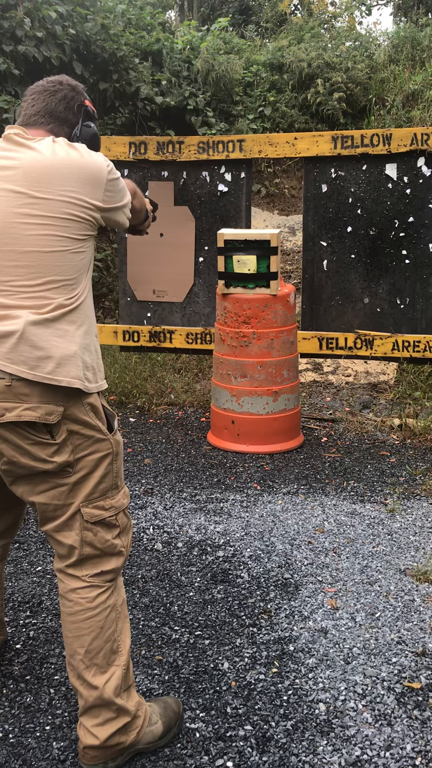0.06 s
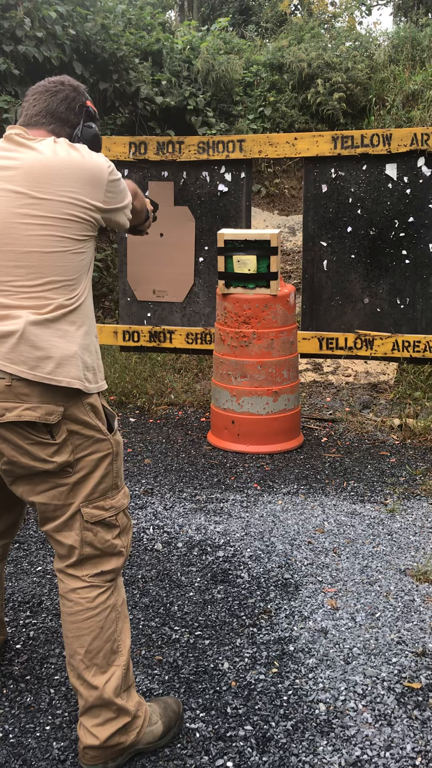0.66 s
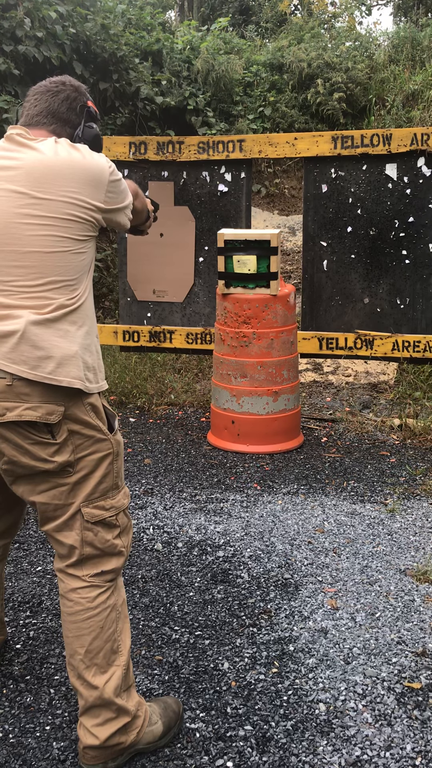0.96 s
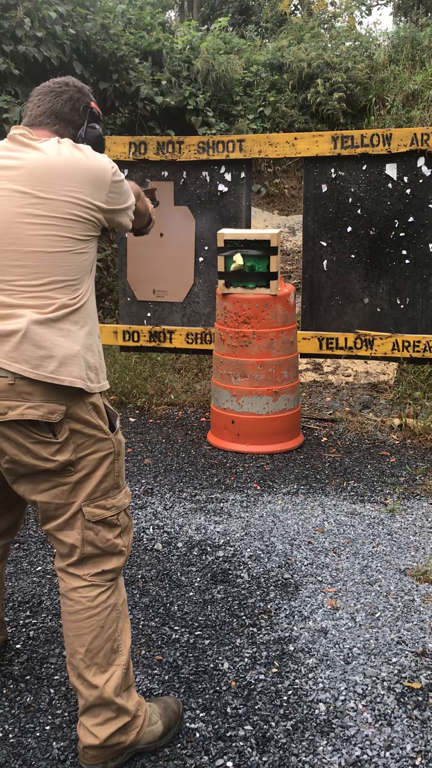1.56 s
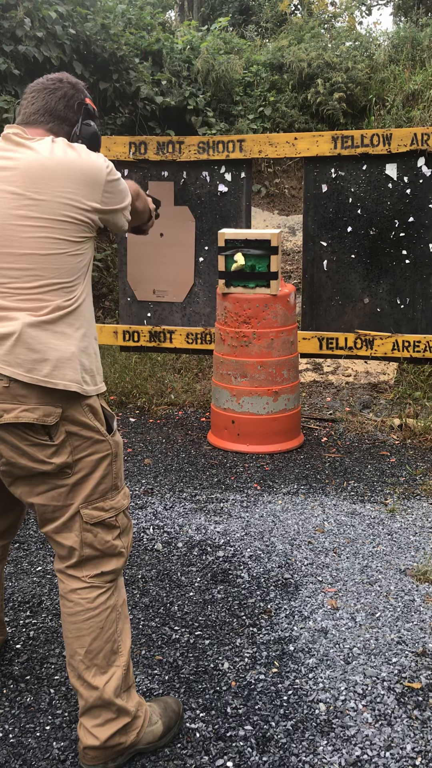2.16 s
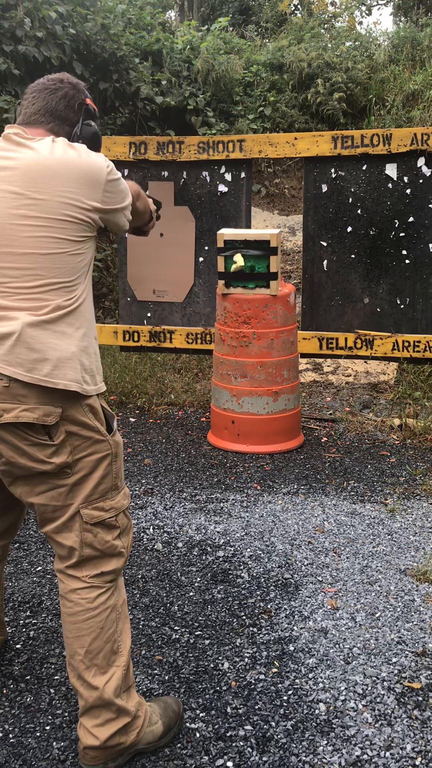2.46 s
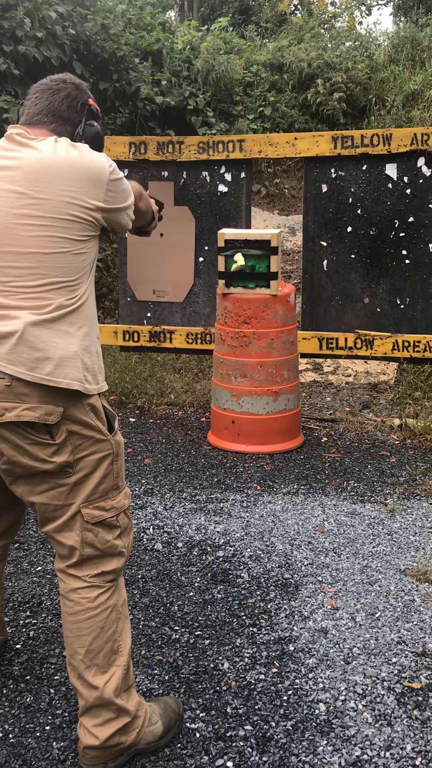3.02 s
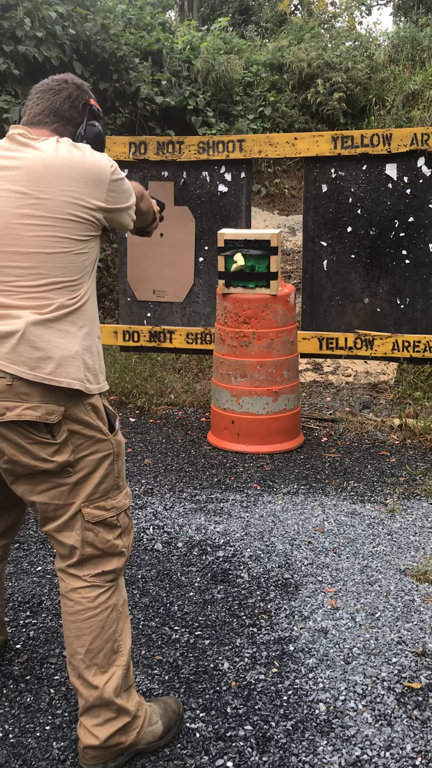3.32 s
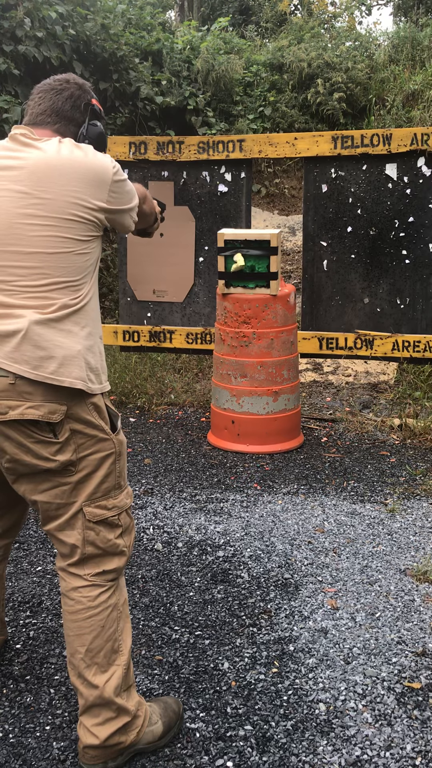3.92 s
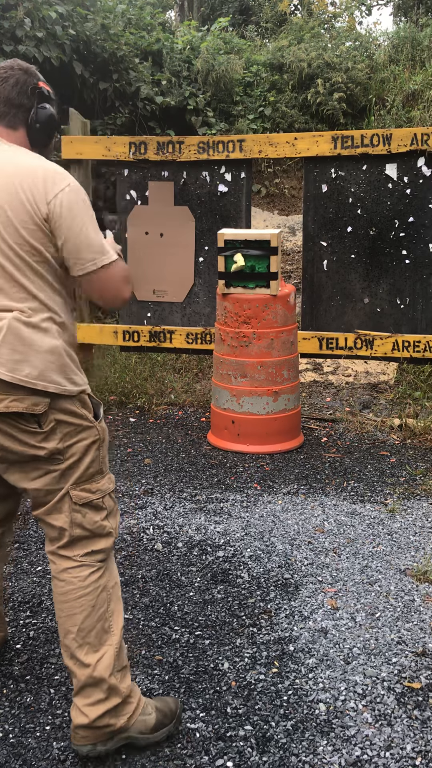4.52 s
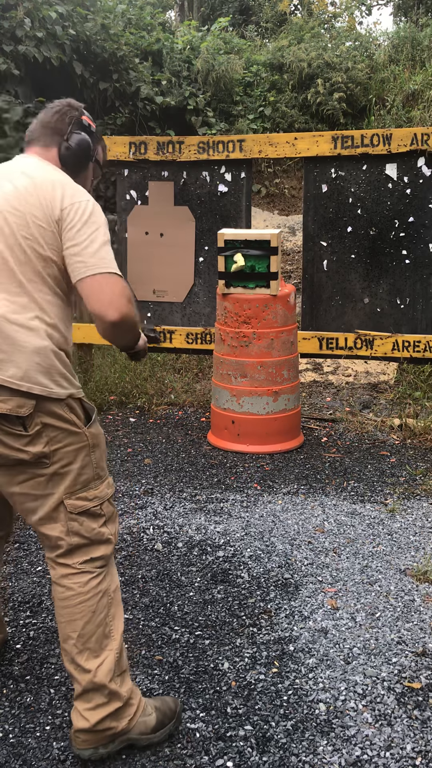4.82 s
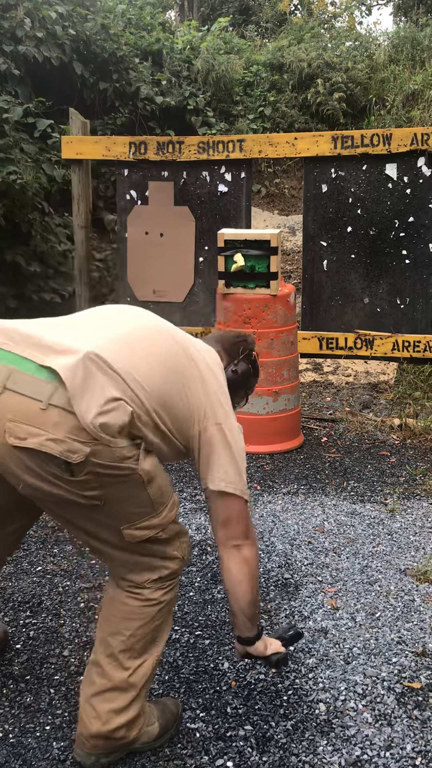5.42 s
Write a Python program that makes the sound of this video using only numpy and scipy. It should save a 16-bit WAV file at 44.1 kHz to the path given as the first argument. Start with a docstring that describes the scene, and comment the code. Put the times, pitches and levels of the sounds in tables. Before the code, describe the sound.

A single close pistol shot echoes outdoors over steady crickets, followed by a casing clink, a metal click and boots on gravel.

```python
"""An outdoor gravel range: one pistol shot, close to a phone whose gain ducks and slowly recovers.
The blast returns from ground, barrier and bank, then as low, hollow reflections; the tree line echoes
and the woods ring on. The brass case lands and bounces, steel parts click in the pistol, and the
shooter's boots grind and snap the gravel. Crickets chirr throughout over a low rumble."""
import sys
import numpy as np
from scipy import signal
from scipy.fft import rfft, irfft, next_fast_len
from scipy.io import wavfile
from scipy.ndimage import uniform_filter1d, minimum_filter1d, map_coordinates

SR = 44100
rng = np.random.default_rng(int(sys.argv[2]) if len(sys.argv) > 2 else 0)


def wav_out(sig):
    """Save sig, one row per channel (or a flat mono array), as 16-bit PCM at SR to the path in sys.argv[1]."""
    wavfile.write(sys.argv[1], SR, np.round(np.clip(np.atleast_2d(sig).T, -1, 1) * 32767).astype(np.int16))


N = 250488
T = np.arange(N) / SR
STONE_HZ = 1500  # typical stone

# Background spectra. Each row: frequency in Hz, level in dB.
RUMBLE_SPECTRUM = [(12, -44.5), (22, -19), (42, -2.5), (60, -1.5), (85, -1), (108, -4), (134, -13.5),
                   (247, -23), (280, -26), (300, -24), (390, -59), (660, -120)]
AIR_SPECTRUM = [(100, -10.5), (250, 7), (500, -0.5), (1100, -2), (2000, -6), (2800, -8.5), (3900, -8),
                (7500, -10.5), (10300, -17), (12500, -12.5), (16000, -16)]
FAR_CRICKET_SPECTRUM = [(4000, -32), (4800, -13.5), (5400, -5.5), (6100, -1), (6500, 5), (6900, -4.5),
                        (7400, -13), (8500, -34.5)]
# Gravel and cloth spectra. Each row: frequency in Hz, level in dB.
GRIT_SPECTRUM = [(100, -11), (300, 2), (700, -5), (1300, 1.5), (2000, -6.5), (3500, -8), (6000, -21.5),
                 (12000, -35)]
SNAP_SPECTRUM = [(900, -18), (2000, -6.5), (2800, -12), (4300, -8.5), (6000, -28), (9000, -33)]
CHIP_SPECTRUM = [(3000, -16), (6000, -9.5), (9000, 3), (10500, -8), (12000, 1), (16000, -13)]
CLOTH_SPECTRUM = [(1000, -38.5), (3000, -3.5), (5000, -1), (8000, 0), (10500, -6), (13000, -5),
                  (16000, -15.5)]
# How hard the shooter moves. Each row: time in seconds, effort in dB.
EFFORT_CURVE = [(3.95, -29.5), (4.1, -14), (4.3, -7), (4.55, 0), (4.78, -15), (5.05, -1.5), (5.4, 3),
                (5.68, 1.5)]
# Sole scuffs. Each row: peak time, swell and fade in seconds, grit and cloth levels in dB.
SOLE_SCUFFS = [(4.614, 0.032, 0.049, -56, -55.5), (4.945, 0.024, 0.018, -55, -60.5),
               (5.102, 0.0393, .015, -60.5, -55), (5.275, .003, 0.031, -62.5, -51),
               (5.355, 0.0186, 0.0175, -71, -56), (5.499, 0.0268, 0.0544, -54.5, -49.5)]
# Stones underfoot. Each row: start in seconds, level in dB, pitch in Hz, relative chip level in dB.
STONE_SNAPS = [(0.284, -50, 1450, -20), (0.433, -52.5, 1490, -12), (4.1142, -52, 1800, -20),
               (4.2068, -44.5, 1630, -22), (4.3128, -26, 1399, -11), (4.362, -44.5, 1752, -24),
               (4.3815, -44, 1690, -18), (4.4523, -29, 1580, -17), (4.5148, -35, 1810, -14),
               (4.6113, -28, 1560, -12), (4.6438, -32, 1650, -26), (4.659, -36.5, 1474, -20),
               (4.733, -43, 1770, -13), (4.9075, -32, 1398, -21), (4.941, -27, 1470, -15.5),
               (5.0763, -34.5, 1540, -16), (5.2743, -42.5, 1400, -2.5), (5.4137, -34, 1330, -18),
               (5.4774, -24, 1210, -13.5), (5.53, -38, 954, -13), (5.5834, -34, 1400, -20),
               (5.5965, -28, 1480, -24), (5.6183, -41, 1400, -17), (5.6512, -34.5, 1350, -25)]
# Steel contacts in the pistol. Each row: start in seconds, level in dB.
STEEL_HITS = [(3.704, -13), (3.7077, -24), (3.7194, -25.5)]
# Spectra of steel on steel and brass on stone. Each row: frequency in Hz, level in dB.
STEEL_SPECTRUM = [(200, -42.5), (700, -42.5), (1300, -10.5), (2000, -21), (2600, -1.5), (3400, 1),
                  (4500, -2), (6000, 4), (8500, -3.5), (10500, -1.5), (12500, -11.5), (16000, -12.5)]
CLINK_SPECTRUM = [(300, -23.5), (1000, -6.5), (2300, -2), (3300, 0), (4700, 3), (7000, -2), (9500, -11),
                  (11500, 4), (13500, -11), (16000, 0)]
# Case landings. Each row: start in seconds, clink, low ring and high ring levels in dB.
CASE_HITS = [(2.5497, -8.5, -40, -28), (2.762, -22, -50, -60)]
# Case modes. Each row: frequency in Hz, relative level in dB, T60 in seconds.
CASE_MODES = [(4190, 13, 0.0132), (4510, -5, 0.093), (4450, 10, 0.016), (5943, 5, 0.0245),
              (11230, -7, 0.219), (11500, 3, 0.075), (13020, -5, .07)]
# Tree line and woods spectra. Each row: frequency in Hz, level in dB.
TREE_LINE_SPECTRUM = [(50, -34), (140, -7), (330, -3.5), (480, -5), (620, 4.5), (950, 1), (1400, -2),
                      (3000, -6), (6500, -11), (10000, -24.5), (15500, -36)]
WOODS_SPECTRUM = [(60, -21), (150, -4), (220, -9.5), (330, 0), (500, -6.5), (900, -2.5), (1500, -7.5),
                  (2500, -6), (5000, -12), (9000, -21), (15000, -59)]
# Decay in the woods. Each row: frequency in Hz, T60 in seconds.
WOODS_DECAY = [(150, 1.67), (400, 2.32), (1000, 2.117), (2500, 1.555), (5000, 1.243), (12000, 0.78)]
# Slaps off far trunks and banks. Each row: start in seconds, level in dB, pitch in Hz.
FAR_SLAPS = [(1.87, -14, 242.5), (1.925, -23, 236), (1.966, -10, 258), (2.01, -29, 170),
             (2.064, -12.5, 355.7), (2.09, -22, 160)]
# Hollow reflections. Each row: start in seconds, level in dB, pitch in Hz, T60 in seconds.
LOW_REFLECTIONS = [(1.728, -7, 305.8, 0.21), (1.742, -3.5, 264, .07), (1.763, -8.5, 540, 0.062),
                   (1.7918, 6, 278.3, 0.023), (1.804, -14.5, 348, 0.079), (1.818, -13, 406, 0.037)]
# The blast and its returns from ground, barrier and bank.
# Each row: start in seconds, boom and crack levels in dB, rise and T60 in seconds.
BLAST_WAVES = [(1.638, -3.5, -1.5, 0.0011, 0.15), (1.6503, 12, -27.5, 0.0018, .13),
               (1.661, 12.5, 12.5, 0.00026, 0.1364), (1.683, -6, 12.5, 0.0022, 0.16),
               (1.692, -7.5, 5, 0.0013, 0.25)]
# Blast spectra. Each row: frequency in Hz, level in dB.
BOOM_SPECTRUM = [(20, -19.5), (45, -4), (80, -3), (120, -6.5), (160, -8.5), (230, -1), (400, 0), (480, -4),
                 (680, -1.5), (820, -12), (970, -0.5), (1400, -15), (3000, -31.5), (8000, -73)]
CRACK_SPECTRUM = [(30, -18.5), (150, -12), (300, -1.5), (480, -1), (1000, 1), (1700, -2), (2400, 1),
                  (3800, -1), (6500, -0.5), (9500, -4), (11000, -7), (15500, -9)]


def amp(db):
    """Decibels to gain."""
    return 10 ** (np.asarray(db) / 20)


def along(points, hz):
    """(Hz, value) points read on a log axis."""
    knots_hz, values = np.transpose(points)
    return np.interp(np.log(hz + 1), np.log(knots_hz), values)


def filtered(x, response):
    """Zero-phase filter with gain response(hz)."""
    size = next_fast_len(N + 8192)
    return irfft(rfft(x, size) * response(np.fft.rfftfreq(size, 1 / SR)), size)[:N]


def noise(spectrum, grain=1):
    """Coloured noise of rms 1; grain gates it before the colouring."""
    x = filtered(grain * rng.standard_normal(N), lambda hz: amp(along(spectrum, hz)))
    return x / np.sqrt(np.mean(x ** 2) + 1e-20)


def wobble(rate_hz):
    """Smooth random curve with knots at rate_hz."""
    return map_coordinates(rng.standard_normal(int(N * rate_hz / SR) + 4), [T * rate_hz])


def burst(start_s, rise_s, t60_s):
    """Envelope with exponential rise and decay."""
    out = np.zeros(N)
    alive = slice(int(start_s * SR) + 1, int((start_s + 2 * t60_s) * SR))
    age_s = T[alive] - start_s
    out[alive] = (1 - np.exp(-age_s / rise_s)) * np.exp(-np.log(1000) * age_s / t60_s)
    return out


def ring(start_s, hz, t60_s, rise_s):
    """One struck, damped mode."""
    out = burst(start_s, rise_s, t60_s)
    alive = out > 0
    out[alive] *= np.sin(2 * np.pi * hz * (T[alive] - start_s))
    return out


def impacts(hits, spectrum, size=1024):
    """Hard contacts (start in seconds, peak in dB), each one minimum-phase pulse."""
    cepstrum = irfft(np.log(amp(along(spectrum, np.fft.rfftfreq(size, 1 / SR)))))
    cepstrum[1:size // 2] *= 2
    cepstrum[size // 2 + 1:] = 0
    pulse = irfft(np.exp(rfft(cepstrum)))
    start_s, peak_db = np.transpose(hits)
    train = np.bincount(np.round(start_s * SR).astype(int), amp(peak_db), N)[:N]
    return signal.fftconvolve(train, pulse / np.abs(pulse).max())[:N]


def outdoors():
    """Lumpy low rumble, soft air and a blur of far crickets."""
    rumble = amp(-53.5 + 1.8 * wobble(10)) * noise(RUMBLE_SPECTRUM)
    air = amp(-65.5 + 0.37 * wobble(2.3)) * noise(AIR_SPECTRUM)
    chorus = amp(-62 + 1.2 * wobble(150)) * noise(FAR_CRICKET_SPECTRUM)
    return rumble + air + chorus


def tree_crickets():
    """Far trills blur into one thin, uneven band."""
    level_db = -81 + 2 * wobble(4.2) + 1.5 * wobble(60)
    return amp(level_db) * noise([(2900, -30.5), (3250, 1), (3450, -0.5), (3800, -31), (5000, -69)])


def peep(peak_s=1.29, pitch_hz=3700, glide_hz=150, width_s=0.014):
    """One faint falling peep from the bushes."""
    position = (T - peak_s) / width_s
    hz = pitch_hz - glide_hz * np.tanh(position) + 60 * wobble(400)
    return amp(-64) * np.exp(-position ** 2) * np.sin(2 * np.pi * np.cumsum(hz) / SR)


def ticking_cricket(period_s=0.0585, gap_s=0.015, pitch_hz=6750, glide_hz=500, width_s=0.002):
    """Paired wing strokes, each a quick downward glide."""
    clock_s = T + 0.002 * wobble(11)
    out = np.zeros(N)
    for offset_s in (0, gap_s):
        position = ((clock_s - offset_s) % period_s - period_s / 2) / width_s
        phase = 2 * np.pi * np.cumsum(pitch_hz - glide_hz * np.tanh(position / 2)) / SR
        out += np.exp(-position ** 2) * np.sin(phase)
    return amp(-53 + 1.7 * wobble(20)) * out


def chirping_cricket(first_s=0.03, period_s=0.2652, stroke_s=0.013, pitch_hz=5615, sag=0.036, rasp=0.0077):
    """Raspy chirps of four wing strokes that sag in pitch; the bushes trail each one."""
    age_s = (T - first_s) % period_s
    strokes = np.abs(np.sin(np.pi * age_s / stroke_s))
    progress = np.minimum(age_s / (4 * stroke_s), 1)
    hz = pitch_hz * (1 - sag * progress ** 3 + rasp * wobble(900))
    phase = 2 * np.pi * np.cumsum(hz) / SR
    swell = strokes * np.abs(np.sin(np.pi * progress)) ** 0.5
    band = noise([(5000, -40.5), (5350, -0.5), (5600, 0.5), (5950, -39.5)])
    trail = np.exp(-((age_s - 0.045) / 0.03) ** 2) * band
    return swell * (amp(-58) * np.sin(phase) + amp(-67) * np.sin(2 * phase)) + amp(-66) * trail


def effort_db():
    """The shooter's effort, per sample."""
    return np.interp(T, *np.transpose(EFFORT_CURVE))


def creaks(count=44, scatter_db=3, pitch_spread=0.2):
    """Stones creak faintly under the shooter's stance, louder as he moves."""
    starts_s = (np.arange(count) + rng.random(count)) * T[-1] / count
    ticks = np.zeros(N)
    for start_s, (size, pitch) in zip(starts_s, rng.standard_normal((count, 2))):
        hz = STONE_HZ * np.exp(pitch_spread * pitch)
        ticks += amp(scatter_db * min(size, 1)) * ring(start_s, hz, t60_s=0.0065, rise_s=0.0004)
    return amp(-47 + 0.34 * effort_db()) * ticks


def crunch(count=260):
    """Small stones click at their own pitches and sizes; rms 1 while the boots move."""
    when, pitch = rng.random((count, 2)).T
    size_db = 4 * np.minimum(rng.exponential(size=count), 3)
    hz = 900 * 4.5 ** (pitch[:, None] ** 1.5)
    age_s = np.arange(SR // 100) / SR
    grains = amp(size_db)[:, None] * np.sin(2 * np.pi * hz * age_s) * np.exp(-0.8 * hz * age_s)
    first = int(EFFORT_CURVE[0][0] * SR)
    index = (first + when[:, None] * (N - first)).astype(int) + np.arange(len(age_s))
    out = np.bincount(index.ravel(), grains.ravel(), N)[:N]
    return out / np.std(out[first:])


def boots():
    """Grit grinds and cloth rustles with the effort; each scuff swells and fades on top."""
    grit_gain, cloth_gain = amp(effort_db() - 63), amp(effort_db() - 65)
    for peak_s, swell_s, fade_s, grit_db, cloth_db in SOLE_SCUFFS:
        stroke = np.exp(-np.maximum((peak_s - T) / swell_s, (T - peak_s) / fade_s))
        grit_gain = np.hypot(grit_gain, amp(grit_db) * stroke)
        cloth_gain = np.hypot(cloth_gain, amp(cloth_db) * stroke)
    grit = noise(GRIT_SPECTRUM, grain=amp(3.2 * wobble(400))) + crunch()
    cloth = noise(CLOTH_SPECTRUM, grain=amp(3.5 * wobble(300)))
    return grit_gain * grit + cloth_gain * cloth


def stones(snap_db_per_octave=28.5):
    """Stones snap with a dull tick and a bright chip; smaller, higher ones snap harder."""
    ticks, snaps, chips = np.zeros((3, N))
    for start_s, db, hz, chip_db in STONE_SNAPS:
        snap_db = -12.5 + snap_db_per_octave * np.log2(hz / STONE_HZ)
        ticks += amp(db + 5.5) * ring(start_s + 0.00067, hz, t60_s=0.0058, rise_s=0.00075)
        snaps += amp(db + snap_db) * burst(start_s + 0.00092, rise_s=0.00008, t60_s=0.014)
        chips += amp(db + chip_db) * burst(start_s + 0.00063, rise_s=0.00018, t60_s=0.0088)
    contacts = impacts([(s + 0.00081, db - 5.5) for s, db, *_ in STONE_SNAPS], GRIT_SPECTRUM)
    return contacts + ticks + snaps * noise(SNAP_SPECTRUM) + chips * noise(CHIP_SPECTRUM)


def pistol_click():
    """Steel parts snap home with a brief rattle; the barrier scatters the click back."""
    rattle = sum(amp(db - 8) * burst(s, rise_s=0.00012, t60_s=0.0068) for s, db in STEEL_HITS)
    scatter = amp(-39.5) * burst(STEEL_HITS[0][0], rise_s=0.0026, t60_s=0.197)
    return impacts(STEEL_HITS, STEEL_SPECTRUM) + (rattle + scatter) * noise(STEEL_SPECTRUM)


def spent_case():
    """The case clinks on a stone and bounces once; its thin ring flutters as it spins."""
    out = impacts([(s, db) for s, db, *_ in CASE_HITS], CLINK_SPECTRUM)
    clink = noise(CLINK_SPECTRUM)
    for start_s, clink_db, low_db, high_db in CASE_HITS:
        strike = burst(start_s, rise_s=0.0001, t60_s=0.0071)
        tail = amp(-22) * burst(start_s, rise_s=0.0028, t60_s=0.18)
        out += amp(clink_db - 9.5) * clink * (strike + tail)
        for hz, mode_db, t60_s in CASE_MODES:
            ring_db = mode_db + (low_db if hz < 8000 else high_db)
            flutter = amp(2.2 * wobble(220))
            out += amp(ring_db) * flutter * ring(start_s, hz, t60_s, rise_s=0.00053)
    return out


def echoes(start_s=1.88):
    """The tree line answers a quarter second after the shot; the woods ring on, treble dying first."""
    slaps = sum(amp(db) * ring(s, hz, t60_s=0.031, rise_s=0.00327) for s, db, hz in FAR_SLAPS)
    hz, frame_s, bins = signal.stft(noise(WOODS_SPECTRUM), SR, nperseg=512)
    fade = np.exp(-np.log(1000) * np.maximum(frame_s - start_s, 0) / along(WOODS_DECAY, hz)[:, None])
    woods = signal.istft(bins * fade, SR, nperseg=512)[1][:N]
    swell = np.clip((T - start_s + 0.0404) / 0.097, 0, 1)
    tree_line = noise(TREE_LINE_SPECTRUM, grain=amp(0.93 * wobble(150)))
    tree_line *= burst(start_s, rise_s=0.086, t60_s=0.53)
    return amp(-8) * tree_line + slaps + amp(-22) * swell * woods


def low_reflections(highpass_hz=160):
    """Short, low, hollow reflections follow the blast."""
    returns = sum(amp(db) * ring(s, hz, t60_s, rise_s=0.0014) for s, db, hz, t60_s in LOW_REFLECTIONS)
    return filtered(returns, lambda hz: 1 - 1 / (1 + (hz / highpass_hz) ** 6))


def shot(push_hz=75, front_db=21):
    """A low pressure push, a sharp front and dense waves of boom and crack."""
    boom_power, crack_power = np.zeros((2, N))
    for start_s, boom_db, crack_db, rise_s, t60_s in BLAST_WAVES:
        wave = burst(start_s, rise_s, t60_s)
        boom_power += (amp(boom_db) * wave) ** 2
        crack_power += (amp(crack_db) * wave) ** 2
    push = amp(-1) * ring(BLAST_WAVES[1][0], push_hz, t60_s=0.11, rise_s=0.003)
    front = impacts([(BLAST_WAVES[2][0] + 0.00093, front_db)], CRACK_SPECTRUM)
    boom = np.sqrt(boom_power) * noise(BOOM_SPECTRUM)
    crack = np.sqrt(crack_power) * noise(CRACK_SPECTRUM, grain=amp(1.4 * wobble(500)))
    return push + front + boom + crack


def scene():
    """Mono sum at the microphone."""
    wildlife = chirping_cricket() + ticking_cricket() + tree_crickets() + peep()
    gunfire = shot() + low_reflections() + echoes() + spent_case() + pistol_click()
    footwork = stones() + boots() + creaks()
    return (outdoors() + wildlife + footwork + gunfire)[None]


def held(cut_db, hold_s):
    """Deepest cut of the last hold_s."""
    count = 2 * int(hold_s * SR / 2) + 1
    return -minimum_filter1d(-cut_db, count, origin=count // 2)


def released(cut_db, db_per_s):
    """Instant rise, steady fall."""
    return np.maximum.accumulate(cut_db + db_per_s * T) - db_per_s * T


def record(dry, threshold_db=-25, range_db=22, hold_s=0.47, slow_share=0.28,
           bass_hz=160, bass_floor_db=10, bass_hold_s=0.954, ceiling=0.95, top_hz=16000):
    """Gain bottoms out on the shot, holds, recovers fast then slowly; peaks saturate."""
    x = dry[0]
    level_db = 10 * np.log10(np.abs(uniform_filter1d(x ** 2, size=300)) + 1e-12)
    over_db = np.clip(2 * (level_db - threshold_db), 0, range_db)
    overload = 1.0 * (over_db >= range_db)
    held_db = np.maximum(over_db, held(range_db * overload, hold_s))
    cut_db = np.maximum(released(held_db, db_per_s=27.5), released(slow_share * held_db, db_per_s=3))
    bass_held_db = held(bass_floor_db * overload, bass_hold_s)
    bass_cut_db = np.maximum(cut_db, released(bass_held_db, db_per_s=90))
    bass = filtered(x, lambda hz: 1 / (1 + (hz / bass_hz) ** 4))
    ducked = (x - bass) * amp(-cut_db) + bass * amp(-bass_cut_db)
    saturated = ducked / (1 + (ducked / ceiling) ** 4) ** (1 / 4)
    return filtered(saturated, lambda hz: 1 / (1 + (hz / top_hz) ** 120))[None]


dry = scene()
out = record(dry)
wav_out(out)
```